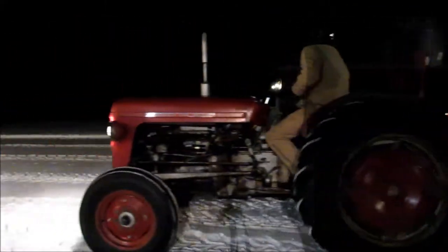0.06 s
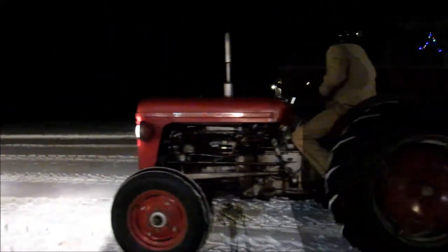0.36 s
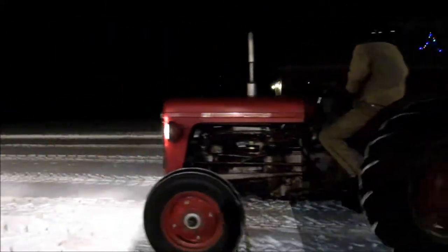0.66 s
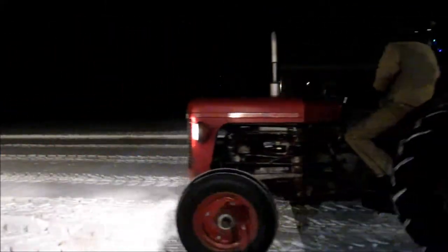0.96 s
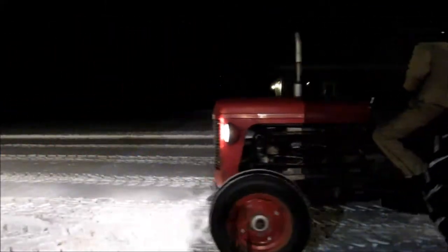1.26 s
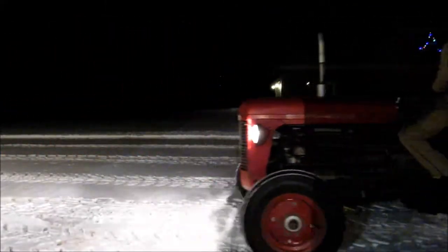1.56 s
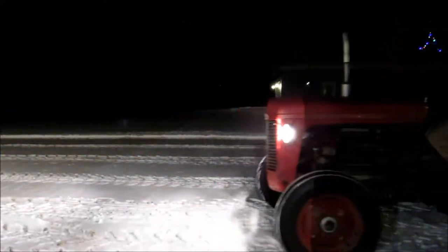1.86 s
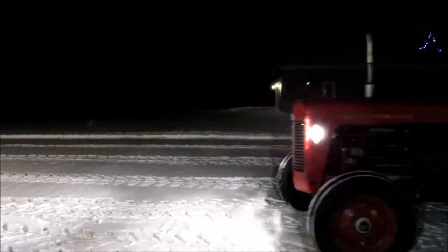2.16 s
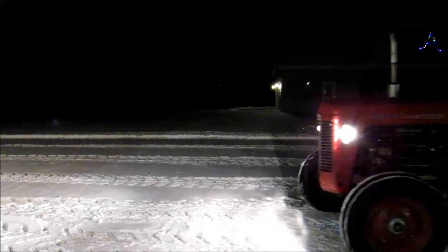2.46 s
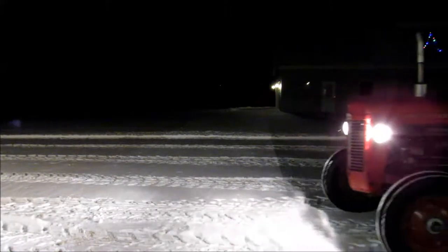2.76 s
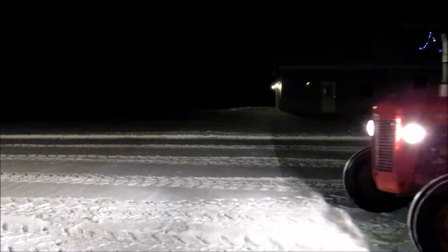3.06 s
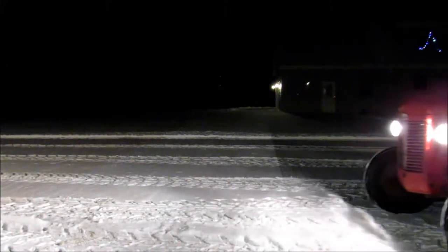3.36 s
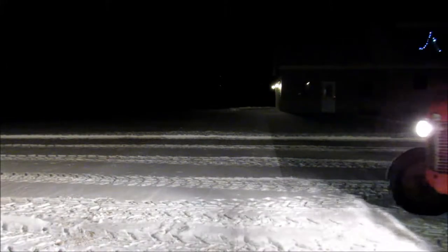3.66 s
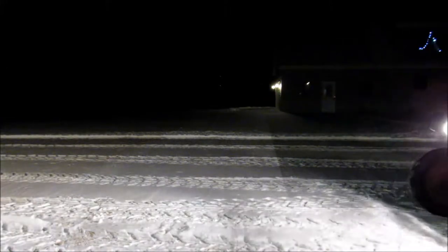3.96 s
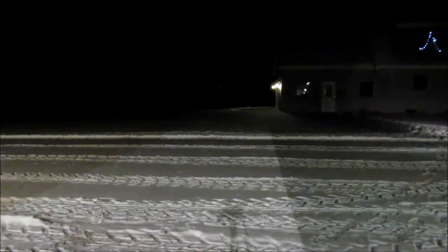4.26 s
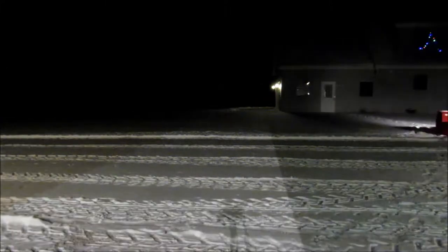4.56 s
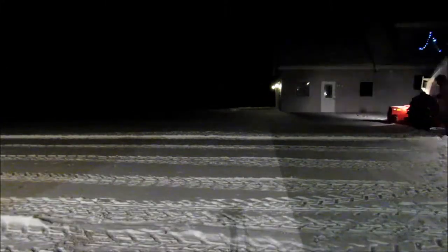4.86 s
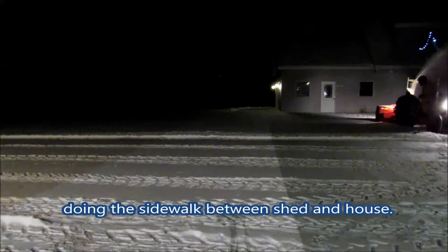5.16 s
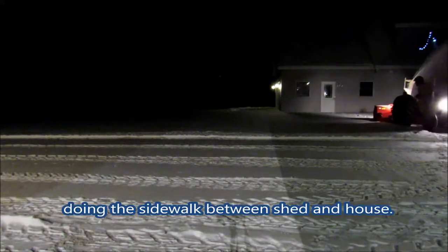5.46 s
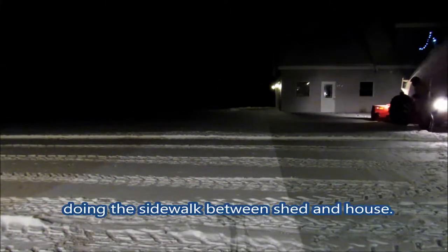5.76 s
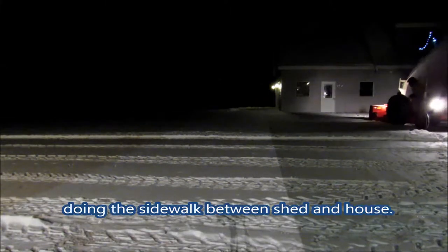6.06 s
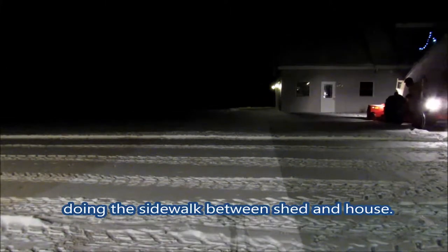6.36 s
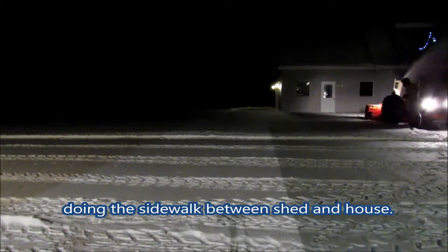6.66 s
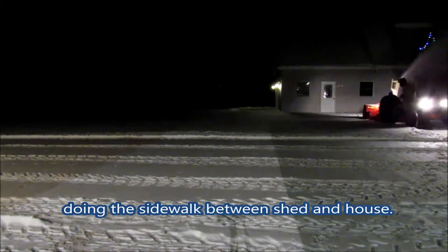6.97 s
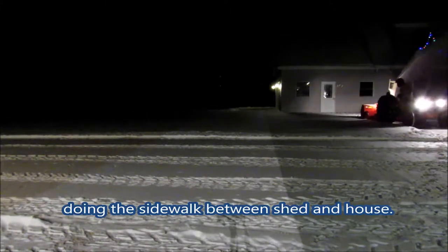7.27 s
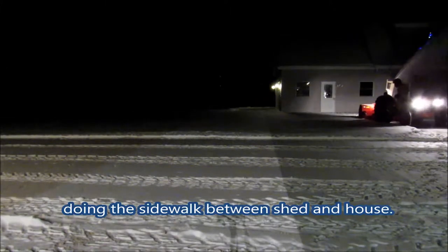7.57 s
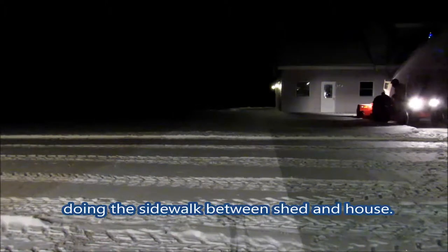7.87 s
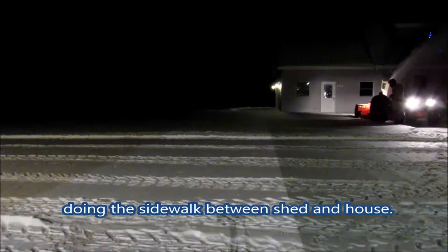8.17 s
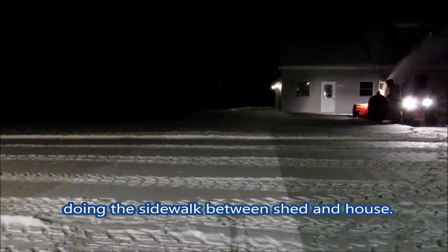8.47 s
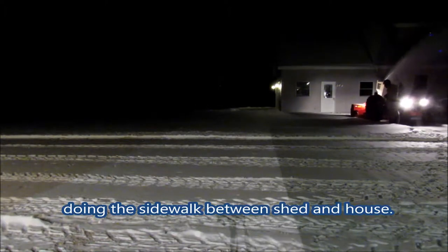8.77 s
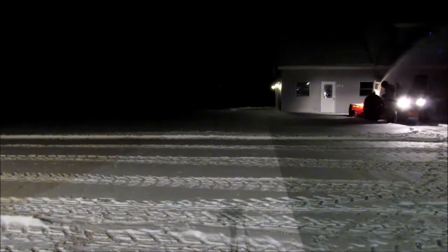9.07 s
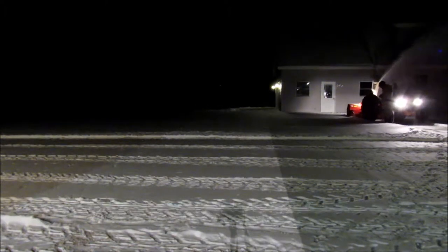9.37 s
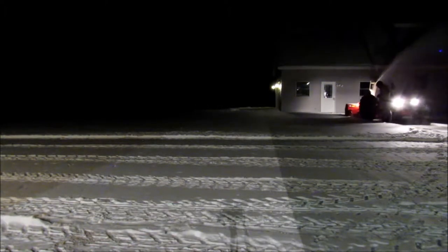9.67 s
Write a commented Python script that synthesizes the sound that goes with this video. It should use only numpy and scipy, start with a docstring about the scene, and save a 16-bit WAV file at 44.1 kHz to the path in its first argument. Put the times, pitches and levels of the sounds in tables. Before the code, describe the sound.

An old tractor runs close by with a clunk, cuts to silence, then drives a snowblower a little further away.

```python
"""Outdoors in the snow, an old four-cylinder petrol tractor drives a snowblower at steady throttle.
First it rolls past close by: the engine block rumbles, gears whine, the valves and chain clatter,
the fan hisses, and one clunk briefly pushes the volume down. A second of silence follows.
Then it works further off beside a house. The blower's blades beat the snow, and each time a
cylinder fires, a pulse of gas makes the exhaust boom and spit sharply."""
import sys
import numpy as np
from scipy import signal
from scipy.fft import rfft, irfft, next_fast_len
from scipy.io import wavfile
from scipy.ndimage import uniform_filter1d

SR = 44100
rng = np.random.default_rng(int(sys.argv[2]) if len(sys.argv) > 2 else 0)


def store_pcm(level_fs):
    """Save levels as 16-bit WAV."""
    pcm = np.round(np.clip(level_fs, -1, 1) * 32767).astype(np.int16)
    wavfile.write(sys.argv[1], SR, np.atleast_2d(pcm).T)


N = 433052
TIME = np.arange(N) / SR
CLOSE_END_S, FAR_START_S = 4.0412, 5.009

def undb(db):
    """Turn decibels into a number to multiply by."""
    return 10 ** (np.asarray(db) / 20)

def unit(x):
    """Scale a sound to an average (rms) size of 1."""
    return x / np.sqrt(np.mean(x ** 2))

def curve(table):
    """Join (time, value) points with straight lines."""
    return np.interp(TIME, *np.transpose(table))

def wander(rate):
    """A random drift that changes course `rate` times a second."""
    steps = rng.standard_normal(1024)
    return 1.2 * np.interp(TIME * rate, np.arange(len(steps)), steps)

def filtered(x, response):
    """Multiply each frequency in a sound by response(frequency)."""
    size = next_fast_len(N, real=True)
    hz = np.arange(size // 2 + 1) * SR / size + 1e-3
    return irfft(rfft(x, size) * response(hz), size)[..., :N]

def colour(x, points):
    """Shape bass and treble along (frequency, level) points."""
    hz, db = np.transpose(points)
    return filtered(x, lambda f: undb(np.interp(np.log(f), np.log(hz), db)))

def ring(x, modes):
    """Make a sound ring at a few pitches."""
    return filtered(x, lambda f: sum(undb(db) / (1 + 1j * (f * f - hz * hz) / (f * width))
                                     for hz, width, db in modes))

# Sound scattered to the sides: (frequency [Hz], level [dB])
SCATTER = [(100, -31.5), (350, -19), (700, -19.5), (1400, -13), (2800, -28.5), (5000, -12), (8000, -9),
           (13000, -10.5)]
def spread(direct, scattered):
    """Left and right share the direct sound; the scattered sound differs."""
    return direct + colour(scattered, SCATTER) * np.array([[1], [-1]])

def bounce(x, delay_s, share):
    """Add a quick echo off bonnet and ground; its path shifts as the tractor moves."""
    n = np.arange(N)
    late = n - delay_s * SR * (1 + .03 * wander(1))
    echo = np.array([np.interp(late, n, side) for side in x])
    return (x + share * echo) / np.hypot(1, share)

def nose():
    """Close by, the tractor reverses until its nose comes past: 0 is the side, 1 the nose."""
    start_s, takes_s = 2.96, .91
    return np.clip((TIME - start_s) / takes_s, 0, 1)

# The turn by the house: (time [s], share facing front [0-1])
TURN = [(6.5, 0.04), (7.6, 0.9), (9.1, 0.88), (9.8, 0.75)]
def front():
    """How far the tractor has turned to face us."""
    return curve(TURN)

# The governor holds the engine near one speed: (time [s], firing rate [Hz])
CLOSE_SPEED = [(0, 62.67), (1.2, 63.45), (4, 62.32)]
FAR_SPEED = [(5, 61.68), (7, 62.05), (7.5, 61.66), (8.2, 61.83), (9.4, 61.26), (9.8, 61.5)]
def firing_count(speed, first_s):
    """Count the firings so far; cylinder one of four fires at first_s."""
    firings = np.cumsum(curve(speed)) / SR
    return firings - firings[int(first_s * SR)] % 4 + 4

def tones(cycles, table, waver_db, waver_rate):
    """Tones locked to a shaft form a pulse; higher ones come later and waver more."""
    out = 0
    for multiple, db in table:
        size = undb(db + waver_db * min(np.sqrt(multiple), 2) * wander(waver_rate))
        late = .33 + .04 * multiple
        out = out - np.sqrt(2) * size * np.cos(2 * np.pi * multiple * (cycles - late))
    return out

def shaken(firings, spectrum, throb, repeat):
    """Noise that throbs at each firing; the share `repeat` is each cylinder's own recurring rattle."""
    pattern = rng.standard_normal((4, 640))
    pattern = unit(pattern - pattern.mean(axis=0)).ravel()
    recurring = pattern[(firings / 4 % 1 * len(pattern)).astype(int)]
    loose, scattered = rng.standard_normal((2, N))
    kick = 1 + throb * np.exp(-(firings % 1) / .25)
    direct = colour(kick * (np.sqrt(repeat) * recurring + np.sqrt(1 - repeat) * loose), spectrum)
    return spread(unit(direct), unit(colour(kick * scattered, spectrum)))

# Tone of the hiss: (frequency [Hz], level [dB])
CLOSE_HISS = [(1500, -28.5), (3000, -0.5), (3900, 2), (5300, -1), (6300, -1), (7300, -3.5), (9200, -2.5),
              (11000, -5), (13000, -8.5), (15000, -11.5)]
FAR_HISS = [(1500, -38), (3200, 2), (4100, 1.5), (5800, -1), (7600, -5.5), (9300, -4.5), (11000, -8.5),
            (13000, -9.5), (15000, -33)]
def fan_hiss(firings, close):
    """The fan and the thrown snow hiss."""
    if close:
        return shaken(firings, CLOSE_HISS, throb=.24, repeat=.038) * undb(-32 - 3 * nose())
    return shaken(firings, FAR_HISS, throb=.24, repeat=.018) * undb(-36)

# Jolts on the close pass: (time [s], level [dB], fade time [s])
JOLTS = [(.07, -21, 0.034), (.32, -20.5, .025), (.5, -20, .02), (0.518, -13.5, .028), (.765, -19, .02),
         (1.46, -24.5, 0.049), (1.55, -23.5, .07)]
def rattles():
    """Loose metal is jolted and rattles away."""
    jolts = sum(undb(db) * (TIME > s) * np.exp(-np.abs(TIME - s) / fade) for s, db, fade in JOLTS)
    spectrum = [(200, -10), (1000, 2.5), (1800, 3), (3000, -8.5), (6000, -10.5), (15000, -26)]
    grit = colour(rng.standard_normal((2, N)), spectrum)
    return jolts * spread(*unit(grit))

# Notes of the tractor's frame: (pitch [Hz], time to fade by 60 dB [s], level [dB])
FRAME_NOTES = [(239, 0.062, 4), (298, .03, -4.5), (160, .04, -13.5)]
def clunk(start_s):
    """A short low knock rings in the frame."""
    age = np.maximum(TIME - start_s, 0)
    return sum(undb(db) * np.sin(2 * np.pi * hz * age) * np.exp(-np.log(1000) * age / fade)
               for hz, fade, db in FRAME_NOTES)

# Gear tones: (pitch [times the firing rate], level [dB])
TIMING_GEARS = [(6, -0.5), (12, -20.5)]
GEARBOX = [(14.7, -5.5), (15, -8.5), (16.6, -6.5), (19.97, 1)]
# Loudness of the timing gears: (time [s], level [dB])
WHINE = [(0, -24.5), (.15, -19.5), (1.5, -22.5), (1.95, -28.5), (2.4, -25), (3.5, -24.5), (3.8, -33)]
def gear_whine(firings):
    """Gear teeth whine as they meet; the gearbox is louder at the nose."""
    timing = tones(firings, TIMING_GEARS, waver_db=.4, waver_rate=16) * undb(curve(WHINE))
    gearbox = tones(firings, GEARBOX, waver_db=1.6, waver_rate=18) * undb(-41 + 6 * nose())
    return timing + gearbox

# Blade tones: (pitch [times the blade rate], level [dB])
CLOSE_BLADES = [(2, -47), (3, -40.5), (4, -42.5), (5, -47), (7, -37)]
FAR_BLADES = [(2, -32.5), (3, -33.5), (4, -31), (5, -35), (7, -45.5)]
# Snow load on the blades: (time [s], level change [dB])
SNOW_LOAD = [(0, 7.5), (4, -1), (5, -4.5), (7.8, 0), (8.4, 3), (9, -8), (9.3, 5), (9.8, -3)]
def blower_blades(firings, close):
    """The blades beat the snow; a shaft turns them in step with the engine."""
    blades_per_firing = .54
    table = CLOSE_BLADES if close else FAR_BLADES
    beat = tones(firings * blades_per_firing, table, waver_db=.5, waver_rate=9)
    return beat * undb(curve(SNOW_LOAD))

# Tone of the clatter: (frequency [Hz], level [dB])
CLOSE_CLATTER = [(400, -38.5), (720, -6.5), (920, 2.5), (1100, -1), (1280, -1.5), (1600, -5), (1950, -6),
                 (2300, -9), (2550, -9.5), (3000, -16), (4500, -25), (9000, -46.5)]
FAR_CLATTER = [(400, -43), (720, -6), (1050, 3), (1220, 0), (1400, 0.5), (1680, -4), (1930, -2), (2280, -9),
               (2520, -5.5), (3000, -14), (4500, -16.5), (9000, -48)]
def metal_clatter(firings, close):
    """The valves, the chain and the blower's feed screw clatter."""
    if close:
        return shaken(firings, CLOSE_CLATTER, throb=.3, repeat=.14) * undb(-24.5)
    return shaken(firings, FAR_CLATTER, throb=.47, repeat=.08) * undb(-27)

# Tone of the rumble: (frequency [Hz], level [dB])
CLOSE_RUMBLE = [(20, -24.5), (45, -12), (80, -12), (130, -1), (220, 1.5), (330, 0), (450, -1), (560, -3),
                (650, -9.5), (800, -12), (1500, -63)]
FAR_RUMBLE = [(20, -22), (45, -21), (80, -5), (125, -7), (190, 3.5), (250, -4), (350, -9.5), (430, -13),
              (530, -11.5), (650, -14), (800, -13.5), (1500, -67)]
def block_rumble(firings, close):
    """Every firing shakes the engine block and the frame."""
    if close:
        return shaken(firings, CLOSE_RUMBLE, throb=.7, repeat=.096) * undb(-19.5 - 3 * nose())
    return shaken(firings, FAR_RUMBLE, throb=.47, repeat=.21) * undb(-21.5 - front())

# Pipe tones; the one near 3 beats slowly against the rest: (pitch [times the firing rate], level [dB])
CLOSE_PIPE = [(1.25, -18.5), (1.5, -11.5), (2, -4), (3.01, 1), (4, -6.5), (4.5, -12.5), (5, -6), (7, -7.5),
              (7.5, -9.5), (9, -13)]
FAR_PIPE = [(1.25, -30), (1.5, -20), (2, 0.5), (2.985, -3.5), (4, -11), (4.5, -17), (5, -22), (5.75, -19),
            (6, -15.5)]
# The boom by the house: (time [s], level [dB])
FAR_BOOM = [(5.1, -22.7), (6.5, -18.5), (7.3, -19.2), (8.5, -23), (9.3, -20.5), (9.8, -17.5)]
def exhaust_boom(firings, close):
    """Pressure pulses make a boom at the firing rate and higher tones in the pipe."""
    if close:
        table, boom_db, pipe_db, waver_db = CLOSE_PIPE, -22.5, -28.5 + 3 * nose(), .8
    else:
        table, boom_db, pipe_db, waver_db = FAR_PIPE, curve(FAR_BOOM), -21, .6
    boom = tones(firings, [(1, 0)], waver_db / 2, waver_rate=16)
    pipe = tones(firings, table, waver_db, waver_rate=14)
    return boom * undb(boom_db) + pipe * undb(pipe_db)

# Ring of the spit from the side and the front: (pitch [Hz], width [Hz], level [dB])
SPIT_SIDE = [(4390, 200, -1.5), (5240, 200, 2), (5460, 300, -1.5), (6110, 210, -1.5), (7300, 230, -19.5),
             (8700, 1200, -13), (11500, 1400, -25.5)]
SPIT_FRONT = [(3100, 70, 2), (4066, 135, 11), (4890, 360, 7.5), (5270, 350, 1), (5800, 156, 9.5),
              (5880, 150, -7), (7140, 400, -23), (9400, 330, 1.5), (11300, 1500, -25.5)]
# Each cylinder's spit, in firing order: (level [dB])
CLOSE_CYLINDERS = [3.5, -3.5, -5.5, -1]
FAR_CYLINDERS = [3, -0.5, 0.5, 2.5]
# Extra hard spits: (time [s], level above the strongest cylinder [dB])
HARD_SPITS = [(5.53, 4), (5.92, 4.5), (6.373, 5.5), (7.34, 2.5), (8.897, 5)]
def exhaust_spit(firings, cylinders_db, scatter_db, rise, decay):
    """A sharp puff of gas at each firing; rise and decay are shares of the time between firings."""
    strength, timing = rng.standard_normal((1024, 2)).T
    size_db = np.resize(cylinders_db, len(strength)) + scatter_db * strength
    puff = firings.astype(int)
    for s, extra_db in HARD_SPITS:
        size_db[puff[int(s * SR)]] = max(cylinders_db) + extra_db
    age = np.maximum(firings % 1 - .04 - .012 * timing[puff], 0)
    shape = (1 - np.exp(-age / rise)) * np.exp(-age / decay)
    gas = undb(size_db[puff]) * shape * rng.standard_normal((2, N))
    direct, scattered = (1 - front()) * unit(ring(gas, SPIT_SIDE)) + front() * unit(ring(gas, SPIT_FRONT))
    dull_body = unit(ring(gas, [(1900, 500, 0), (2510, 350, -1)]))[0]
    return spread(direct + undb(-7.5) * dull_body, undb(3) * scattered)

def close_pass():
    """Beside the engine, the shaking metal and the gears compete with the exhaust."""
    firings = firing_count(CLOSE_SPEED, first_s=.0088)
    boom = exhaust_boom(firings, close=True)
    gears = gear_whine(firings)
    rumble = block_rumble(firings, close=True)
    clatter = metal_clatter(firings, close=True)
    hiss = fan_hiss(firings, close=True)
    spit = exhaust_spit(firings, CLOSE_CYLINDERS, scatter_db=1.2, rise=.04, decay=.15)
    spit_db = -42.5 + 4.5 * np.exp(-TIME / .9) - 3 * nose()  # starts in the open, then the engine hides it
    machine = boom + gears + blower_blades(firings, close=True) + rumble + clatter
    return machine + bounce(hiss, delay_s=.003, share=.47) + spit * undb(spit_db)

# The blower bites into snow: (time [s], extra spit level [dB])
SURGES = [(6.48, 3), (7.65, 2.3), (8.85, 2), (9.79, 3.5)]
def far_work():
    """By the house the exhaust leads; the spit and the churning swell with each bite of snow."""
    firings = firing_count(FAR_SPEED, first_s=5.025)
    surge_db = sum(db * np.exp(-((TIME - s) / .13) ** 2) for s, db in SURGES)
    boom = exhaust_boom(firings, close=False)
    rumble = block_rumble(firings, close=False)
    clatter = metal_clatter(firings, close=False)
    hiss = fan_hiss(firings, close=False)
    spit = exhaust_spit(firings, FAR_CYLINDERS, scatter_db=1.5, rise=.032, decay=.145)
    spit_db = -34.5 + 2.04 * front() + surge_db
    churn = rumble + bounce(clatter + hiss, delay_s=.0058, share=.21) * undb(.8 * front())
    blades = blower_blades(firings, close=False)
    return boom + blades + churn * undb(.43 * surge_db) + spit * undb(spit_db)

def scene():
    """The close pass, a cut to silence, then the work by the house."""
    passing = close_pass() + clunk(start_s=.5158) * undb(-2.5) + rattles()
    return passing * (TIME < CLOSE_END_S) + far_work() * (TIME >= FAR_START_S)

def gain_control(x, limit_db=-10.2, listen_s=.018, release_s=.9):
    """Anything over the limit turns the volume down at once; then it creeps back up."""
    power = uniform_filter1d(np.mean(x ** 2, axis=0), int(listen_s * SR))
    over_db = np.maximum(10 * np.log10(np.abs(power) + 1e-12) - limit_db, 0)
    release = np.exp(-TIME / release_s)
    return x * undb(-np.maximum.accumulate(over_db / release) * release)

# Microphone balance: (frequency [Hz], left minus right [dB])
BALANCE = [(60, -2.5), (700, -2.5), (1300, -3), (2400, -0.5), (4400, -1), (8000, -0.5), (14000, 1.1)]
# How far the left microphone's wave runs ahead: (frequency [Hz], lead [radians])
LEFT_LEAD = [(0, 0), (3700, -0.49), (8000, 0.6), (10500, -1.2), (13400, -1.2), (15300, -3)]
def record(dry):
    """Two microphones favour the right and dip in the midrange; then gain control and a treble cut."""
    def left_and_right(hz):
        """Each side gets half of the difference in level and timing."""
        half = np.array([[.5], [-.5]])
        gain = undb(half * np.interp(hz, *np.transpose(BALANCE)))
        return gain * np.exp(1j * half * np.interp(hz, *np.transpose(LEFT_LEAD)))

    pair = filtered(dry, left_and_right)
    dip_hz, dip_width_hz, dip_depth, top_hz = 697, 140, .84, 14900
    notched = signal.lfilter(*signal.iirnotch(dip_hz, dip_hz / dip_width_hz, fs=SR), pair)
    pair = pair + dip_depth * (notched - pair)
    treble_cut = signal.ellip(10, .2, 80, top_hz, fs=SR, output="sos")
    return signal.sosfilt(treble_cut, gain_control(pair))

dry = scene()
out = record(dry)
store_pcm(out)
```